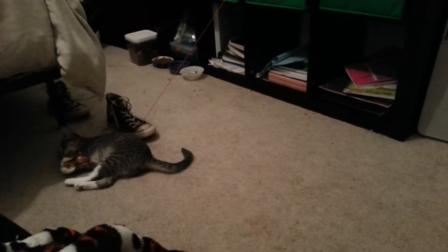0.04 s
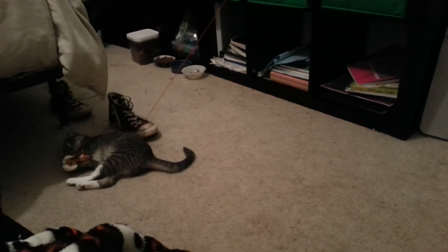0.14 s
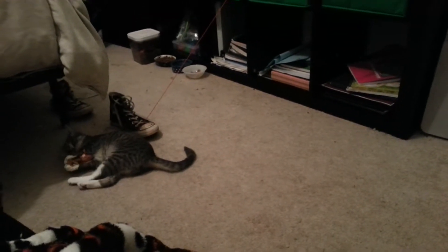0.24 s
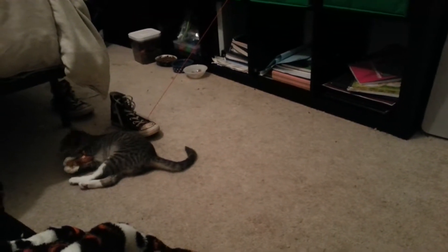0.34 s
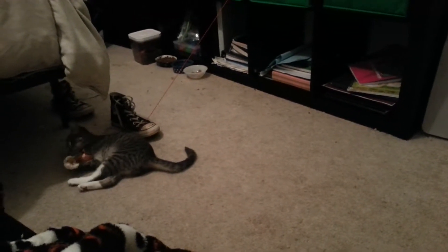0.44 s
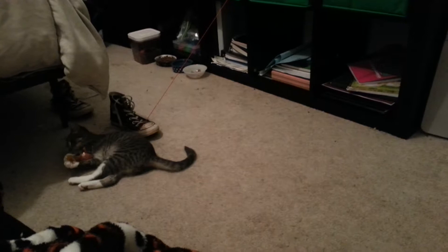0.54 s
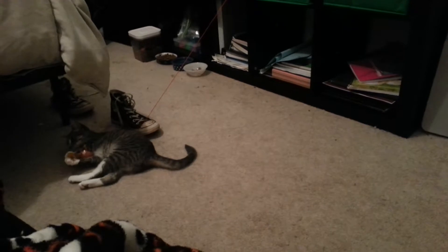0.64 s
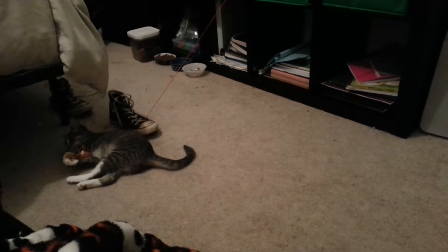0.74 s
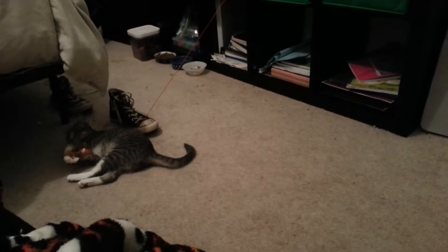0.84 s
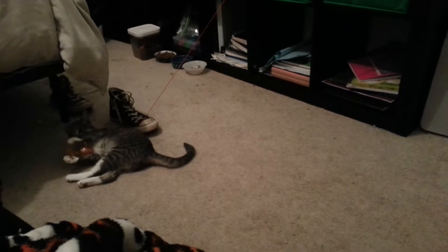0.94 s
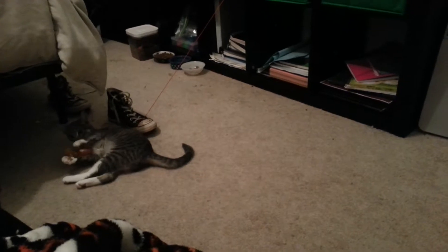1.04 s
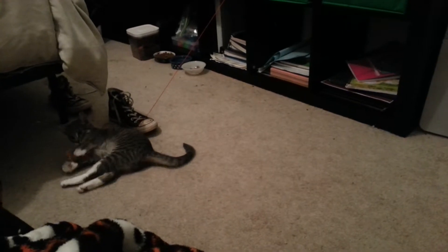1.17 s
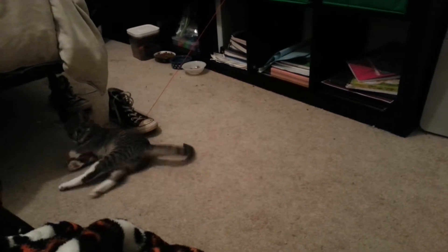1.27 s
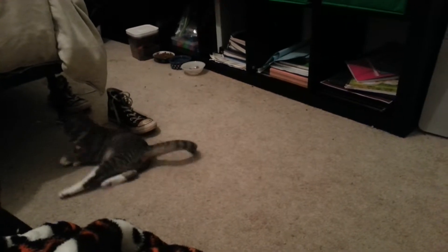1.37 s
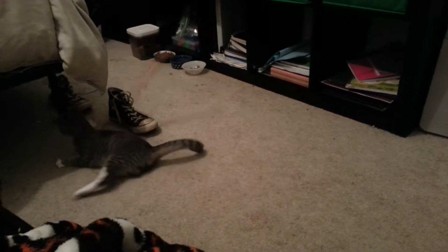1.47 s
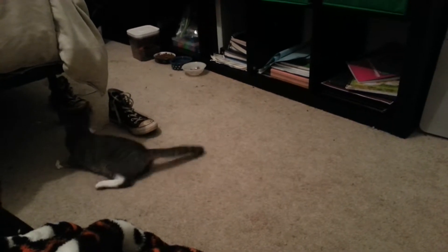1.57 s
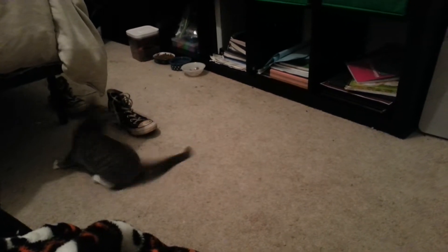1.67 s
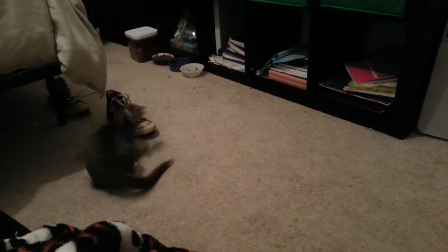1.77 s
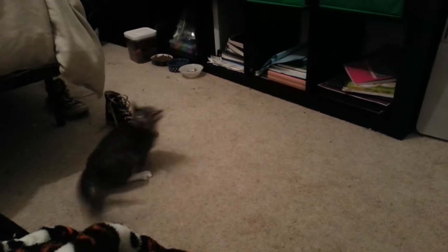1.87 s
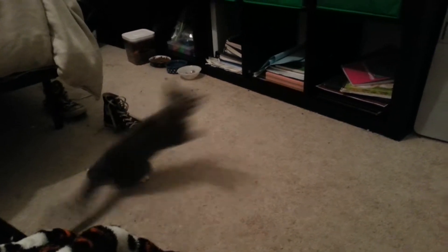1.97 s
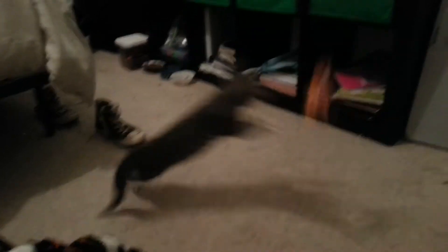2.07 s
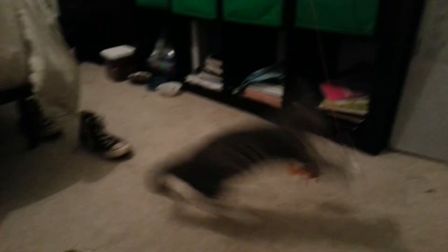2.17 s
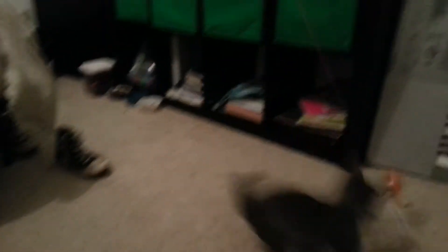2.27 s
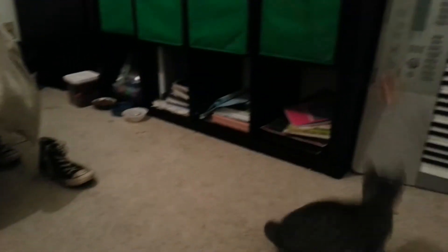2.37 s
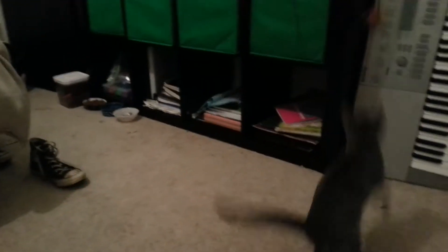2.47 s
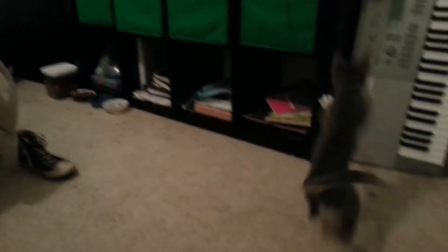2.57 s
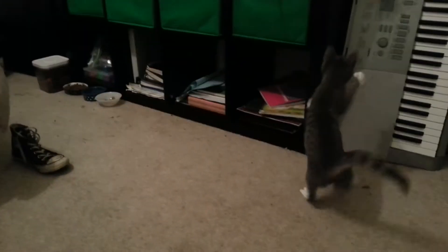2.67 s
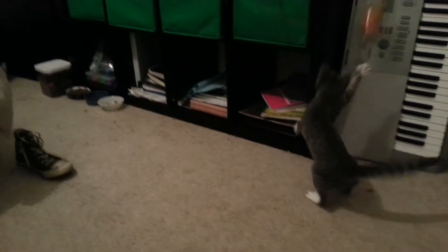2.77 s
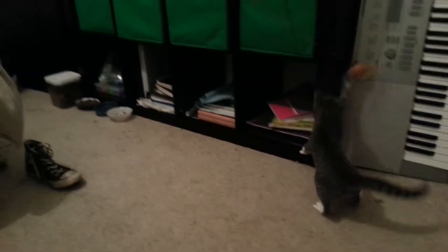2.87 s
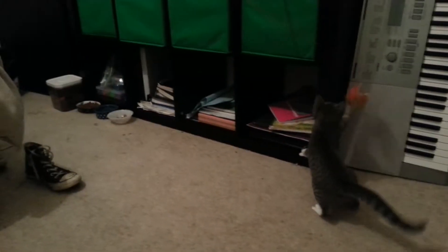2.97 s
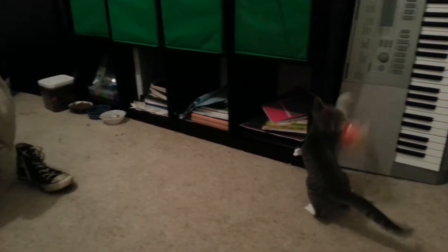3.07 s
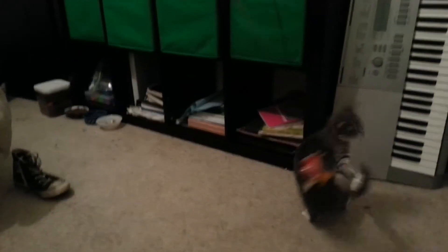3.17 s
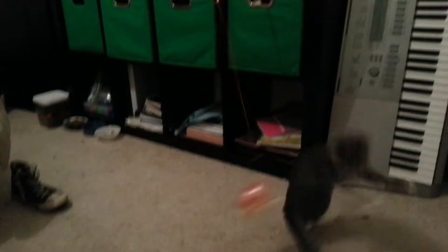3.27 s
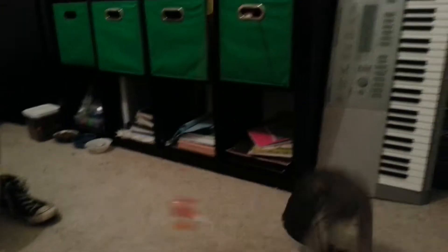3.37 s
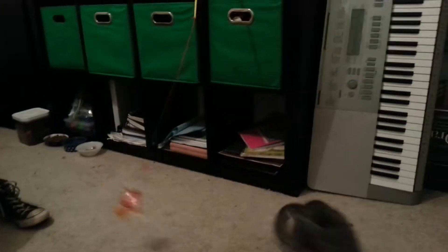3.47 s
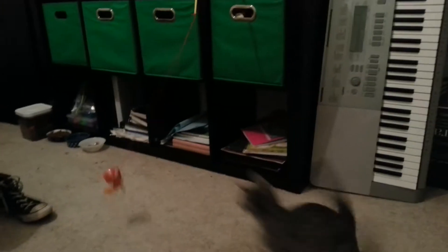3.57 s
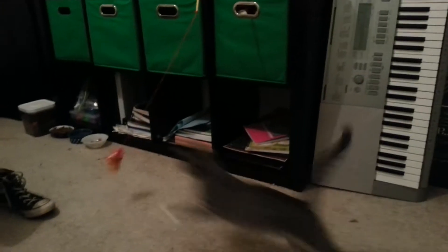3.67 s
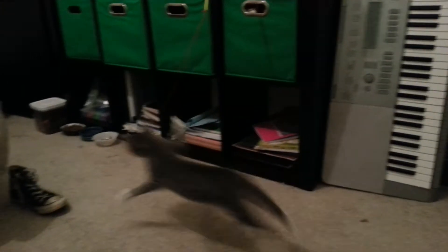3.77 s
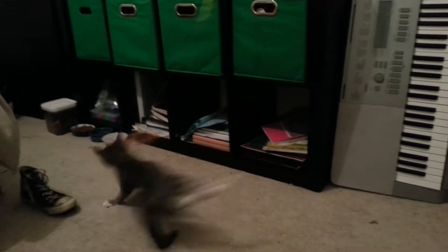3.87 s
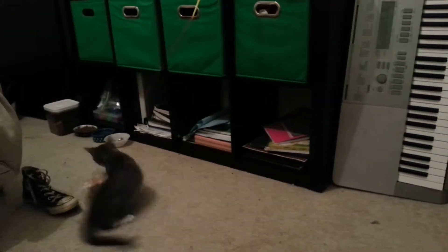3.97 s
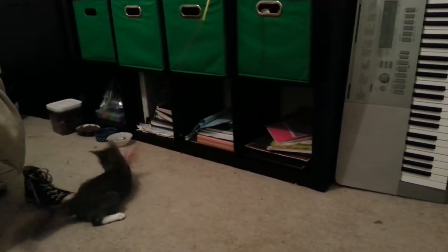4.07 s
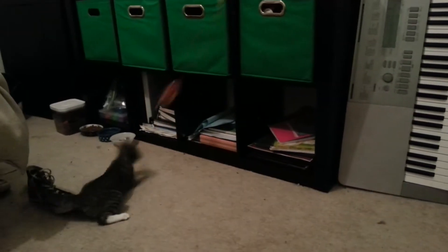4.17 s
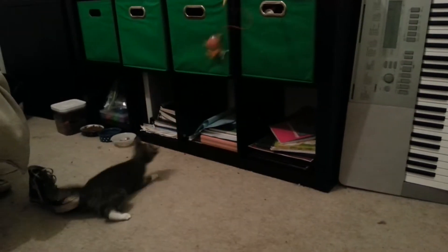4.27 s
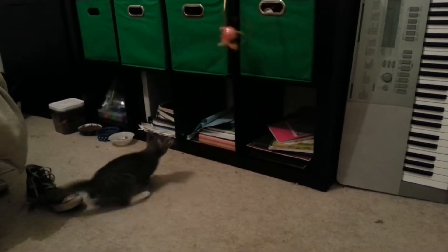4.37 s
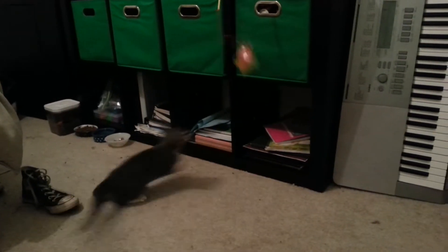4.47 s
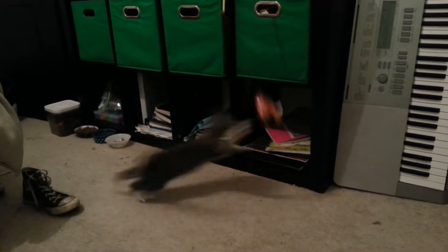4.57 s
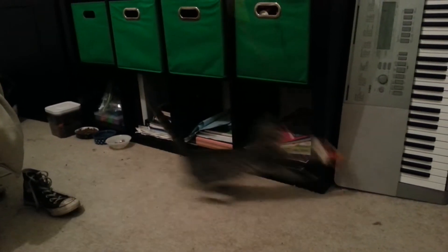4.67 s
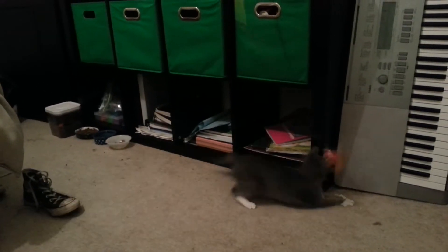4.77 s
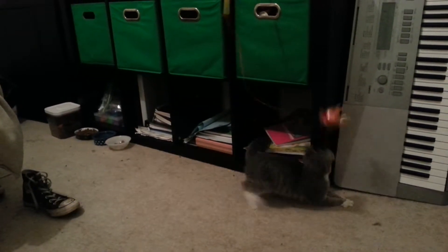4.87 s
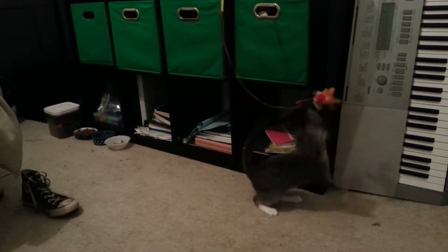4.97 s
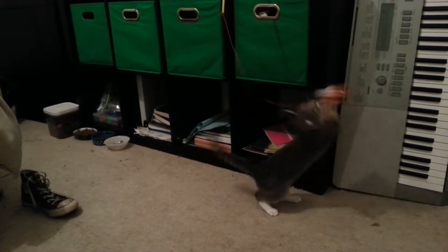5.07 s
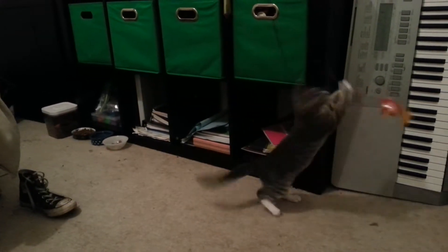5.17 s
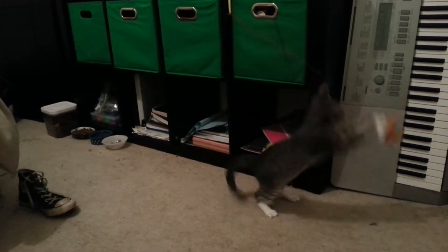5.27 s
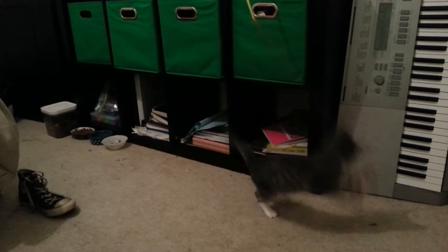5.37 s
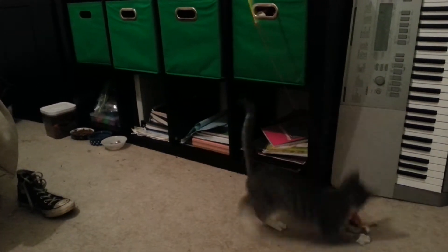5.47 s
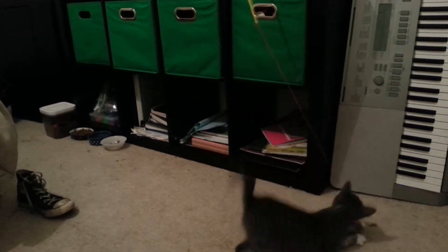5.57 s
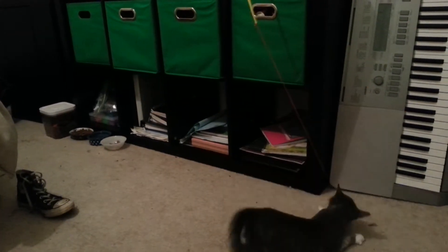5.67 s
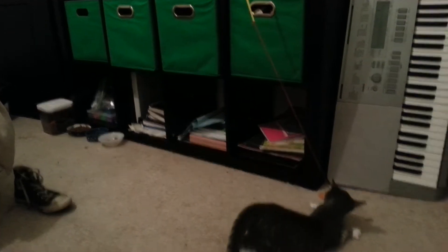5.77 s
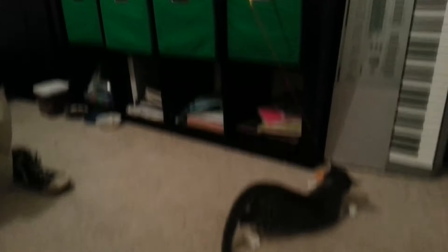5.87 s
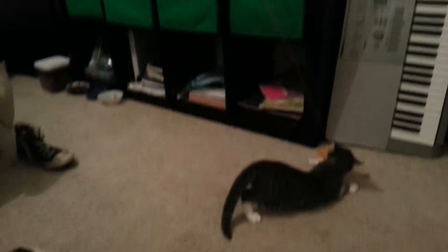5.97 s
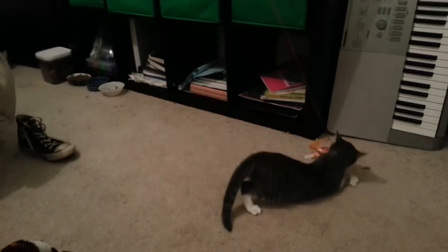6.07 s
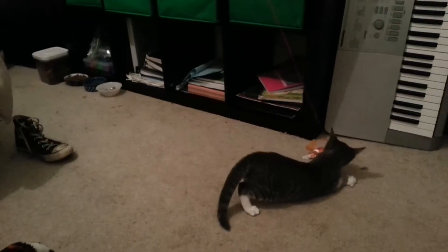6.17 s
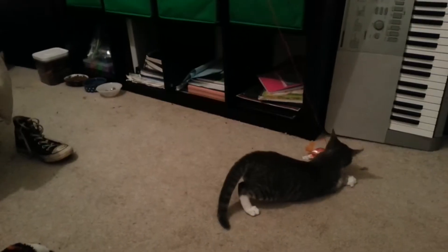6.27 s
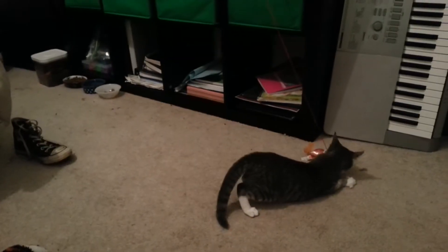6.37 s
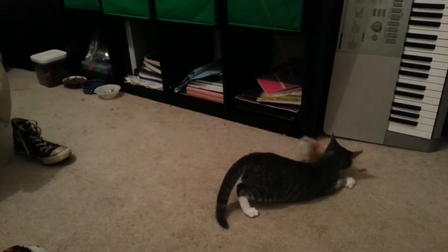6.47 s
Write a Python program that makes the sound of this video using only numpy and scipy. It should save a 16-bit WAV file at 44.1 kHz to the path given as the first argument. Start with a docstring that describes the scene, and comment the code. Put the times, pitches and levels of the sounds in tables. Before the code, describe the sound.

In a small carpeted room, a low hum and faint trickling bubbles set the background. Close by and slightly right of the stereo microphone, a kitten springs up, its paws thudding on the floor and its claws scuffing the carpet. Near the middle, a toy on a string clacks hard against a hollow plastic case, which bumps the floor. More soft pounces, scuffs and a few light taps follow, then the playing stops.

```python
"""Kitten at play in a bedroom

A small carpeted room, on a stereo microphone. Close by and a little to the right, a kitten chases a toy
on a string: paws thud on the floor, claws and fur scuff the pile, and the swinging toy clacks against
furniture, once hard on the hollow plastic case of a leaning keyboard, which bumps down on the floor.
Farther off, bubbles trickle faintly, as from a tank filter, over a low room hum."""
import sys
import numpy as np
from scipy import signal
from scipy.fft import rfft, irfft, next_fast_len
from scipy.io import wavfile
from scipy.ndimage import uniform_filter1d

SR = 44100
rng = np.random.default_rng(int(sys.argv[2]) if len(sys.argv) > 2 else 0)


def output_pcm(signal):
    """Save a mono or channel-first signal as 16-bit PCM at the path in sys.argv[1].

    Samples are clipped to [-1, 1] before scaling.
    """
    pcm = np.clip(np.atleast_2d(signal).T, -1, 1) * 32767
    wavfile.write(sys.argv[1], SR, np.round(pcm).astype(np.int16))


N = 287776
T = np.arange(N) / SR
SHORT_T = T[:SR // 2]  # half a second, for one event or one room response


def undb(db):
    """Decibels to gain."""
    return 10 ** (np.asarray(db) / 20)


def unit(x):
    """Scale to rms 1."""
    return x / np.sqrt(np.mean(x ** 2))


def unit_energy(x):
    """Scale a short sound to the energy of 10 ms at rms 1."""
    return x / np.sqrt(np.sum(x ** 2) / (SR / 100))


def add(track, start_s, x):
    """Mix x into the track from start_s on."""
    i = max(int(start_s * SR), 0)
    track[..., i:i + x.shape[-1]] += x[..., :N - i]


def shape(x, gain):
    """Filter by a gain that is a function of frequency."""
    size = next_fast_len(2 * x.shape[-1])
    hz = np.maximum(np.fft.rfftfreq(size, 1 / SR), 1)
    return irfft(rfft(x, size) * gain(hz), size)[..., :x.shape[-1]]


def colour(x, points):
    """Minimum-phase filter through points of f/Hz, gain/dB."""
    point_hz, point_db = np.transpose(points)
    hz = np.maximum(np.fft.rfftfreq(2048, 1 / SR), 1)
    gain = undb(np.interp(np.log(hz), np.log(point_hz), point_db))
    cepstrum = irfft(np.log(gain))
    half = len(cepstrum) // 2
    cepstrum[1:half] *= 2  # folding onto positive time makes the filter causal
    cepstrum[half + 1:] = 0
    impulse = irfft(np.exp(rfft(cepstrum)))
    return np.apply_along_axis(signal.fftconvolve, -1, x, impulse)[..., :x.shape[-1]]


def ring(modes):
    """Decaying tones, all struck together, from rows of f/Hz, level/dB, t60/s."""
    return sum(undb(db - 60 * SHORT_T / t60) * np.cos(2 * np.pi * hz * SHORT_T) for hz, db, t60 in modes)


def diffuse(size, apart_hz, bass_side):
    """Stereo noise, alike in the bass and unrelated well above apart_hz."""
    def side_share(hz):
        return np.clip(bass_side + (1 - bass_side) * hz ** 2 / (hz ** 2 + apart_hz ** 2), 0, 1) / 2

    mid, side = rng.standard_normal((2, size))
    mid = shape(mid, lambda hz: np.sqrt(1 - side_share(hz)))
    side = shape(side, lambda hz: np.sqrt(side_share(hz)))
    return np.array([mid + side, mid - side])


def room_tone(noise_db=-55):
    """Ventilation rumble, microphone hiss and a few faint machine tones."""
    # spectrum of the still room: f/Hz, relative level/dB
    spectrum = [(15, -78), (25, -47), (44, -16.5), (141, -2.5), (240, -3.5), (331, -8.5), (468, -11),
                (796, -14), (910, -14), (1190, -15), (2080, -18), (2780, -22.5), (3010, -18), (6520, -27.5),
                (14500, -23.5)]
    # steady machine tones: f/Hz, level/dB
    tones = [(60, -79.5), (97, -80.5), (715, -79), (2105, -83), (14002, -82)]
    noise = unit(colour(diffuse(N, apart_hz=780, bass_side=0.61), spectrum))
    hum = sum(undb(db) * np.sqrt(2) * np.sin(2 * np.pi * (hz * T + rng.random())) for hz, db in tones)
    return undb(noise_db) * noise + hum


def floor_thuds(gain_db=-4, second_db=-5, soft_s=0.004, hard_s=0.0028, range_db=31, detune=0.017):
    """Paws land, and once the struck keyboard bumps down: boards ring, with a deep thump or a knock."""
    # thuds of two contacts each (for the kitten, fore then hind paws):
    # t/s, level/dB, hardness (0 thump, 1 knock), second contact's delay/s, knock pitch ratio
    thuds = [(0.02, -48, 0.95, 0.0119, 1.103), (1.634, -32.5, 0.95, 0.03, 1.178),
             (1.642, -28.5, 0.035, 0.025, 1), (2.347, -35.5, 0.59, 0.037, 1.02),
             (2.507, -40, 0.61, 0.042, 0.99), (2.701, -38.5, 0.85, 0.074, 1),
             (2.944, -32, 0.88, 0.028, 1.1), (3.531, -34.5, 0.65, .052, 0.89),
             (3.94, -44.5, 0.69, 0.028, 0.89), (4.027, -40.5, 0.81, .02, 1.03), (4.107, -40, 0.85, .05, 1),
             (4.327, -34.5, 0.09, 0.01214, 1.33), (4.794, -32.5, 1, .026, 0.738),
             (5.505, -35, 0.26, 0.11, .8)]
    # ring of the floorboards: f/Hz, level/dB, t60/s
    board_modes = [(196.4, -1, 0.043), (220.7, 0, 0.13), (258, -5, 0.09), (299.6, -0.5, 0.073),
                   (361, -4.5, 0.081)]
    # the whole floor giving under the weight: f/Hz, level/dB, t60/s
    joist_modes = [(95.5, -21, 0.15), (171.6, 3.5, 0.026)]
    # knock of a hard contact: f/Hz, level/dB, t60/s
    knock_modes = [(427, -11.5, 0.038), (399.4, -5, 0.065), (474, 13, 0.029), (571, -6.5, 0.1),
                   (667, -1, 0.035)]
    out = np.zeros(N)
    soft_onset = (1 - np.exp(-SHORT_T / soft_s)) ** 2
    hard_onset = (1 - np.exp(-SHORT_T / hard_s)) ** 2
    thump = unit_energy(ring(joist_modes) * soft_onset)
    floor_spots = 2 * rng.random((len(thuds), 2)) - 1
    for (start_s, db, hardness, second_s, knock_pitch), spots in zip(thuds, floor_spots):
        thump_gain = undb(2 - range_db * hardness)
        knock_gain = undb(1 - range_db * (1 - hardness))
        for delay_s, contact_db, spot in zip((0, second_s), (0, second_db), spots):
            retune = np.array([1 + detune * spot, 1, 1])  # each spot on the floor has its own pitch
            boards = unit_energy(ring(board_modes * retune) * soft_onset)
            knock = unit_energy(ring(knock_modes * retune * [knock_pitch, 1, 1]) * hard_onset)
            # a lighter contact loses thump and knock faster than the ring of the boards
            contact = boards + undb(contact_db) * (thump_gain * thump + knock_gain * knock)
            add(out, start_s + delay_s, undb(db + gain_db + contact_db) * contact)
    # a small patch of floor radiates no deep bass
    return shape(out, lambda hz: 1 / np.sqrt(1 + (72 / hz) ** 10))


def trickle(count=300, small_db=-67, spread_db=4, middle_hz=2800, spread_octaves=0.364,
            decay_cycles=9, glide=0.025, swell_s=0.0064, wobble=0.059):
    """Bubbles ring for some cycles, wobble and rise in pitch; many small ones lie under the clear ones."""
    # the clearest bubbles: t/s, f/Hz, level/dB
    clear_bubbles = [(0.086, 2930, -55), (0.325, 1406, -48), (1.225, 2120, -57), (1.367, 2520, -58.5),
                     (2.036, 2510, -52.5), (2.421, 2530, -54.5), (2.816, 2790, -58), (3.895, 3220, -53),
                     (5.608, 2400, -51), (6.057, 2940, -58.5)]
    out, t = np.zeros(N), T[:SR // 10]
    starts = rng.random(count) * T[-1]
    pitch_scatter, level_scatter = rng.standard_normal((count, 2)).T
    pitches = middle_hz * 2 ** (spread_octaves * pitch_scatter)
    levels = small_db + spread_db * np.minimum(level_scatter, 1)
    small_bubbles = list(zip(starts, pitches, levels))
    for start_s, hz, db in clear_bubbles + small_bubbles:
        age = hz * t / decay_cycles
        waver = wobble * unit(uniform_filter1d(rng.standard_normal(len(t)), size=60))
        rise = glide * (np.minimum(age, 3) - 1)
        phase = 2 * np.pi * np.cumsum(hz * (1 + waver + rise)) / SR
        envelope = np.exp(-age) * (1 - np.exp(-t / swell_s))
        add(out, start_s, undb(db) * unit_energy(np.sin(phase) * envelope))
    return out


def scuffs(fibres_per_s=1200, grain_db=6.5, rise_share=0.033,
           sheen_hz=11000, sheen_db=5, sheen_slope=0.69):
    """Fibres snap free one after another in a spray of uneven clicks; louder strokes have more sheen."""
    # claws and fur dragged over carpet and cloth: t/s, level/dB, fade time/s
    strokes = [(1.511, -52, 0.076), (1.636, -38, 0.041), (2.256, -50.5, 0.055), (2.334, -52.5, 0.26),
               (2.519, -41.5, 0.028), (2.70, -53.5, 0.053), (3.524, -50.5, 0.062), (3.934, -49, 0.13),
               (4.073, -48, 0.026), (4.119, -48, 0.075), (4.321, -51, .034), (4.675, -51, 0.082),
               (4.769, -47.5, 0.087), (5.118, -49, 0.08), (5.36, -56, 0.32), (5.504, -47.5, 0.052)]
    # spectrum of the snapping fibres: f/Hz, relative level/dB
    spectrum = [(200, -3), (600, 5), (1500, 2), (3000, 4), (4800, 5), (6300, -1.5), (10000, -2.5),
                (14500, -13)]
    drag_envelope, sheen_envelope = np.zeros((2, N))
    loudest_db = max(db for _, db, _ in strokes)
    for start_s, db, fade_s in strokes:
        rise_s = rise_share * fade_s
        fade = np.exp(-np.maximum(SHORT_T - rise_s, 0) / fade_s)
        stroke = undb(db) * np.minimum(SHORT_T / rise_s, 1) * fade
        add(drag_envelope, start_s, stroke)
        add(sheen_envelope, start_s, stroke * undb(sheen_db + sheen_slope * (db - loudest_db)))
    sizes = undb(grain_db * np.minimum(rng.exponential(size=N), 4))
    snaps = (rng.random(N) < fibres_per_s / SR) * sizes * rng.choice([-1, 1], N)
    drag = unit(colour(snaps, spectrum))
    # shifted by a second, so the sheen's clicks fall apart from the drag's
    sheen = unit(shape(np.roll(snaps, SR), lambda hz: 1 / np.sqrt(1 + (sheen_hz / hz) ** 6)))
    return drag_envelope * drag + sheen_envelope * sheen


def clacks(crack_s=0.0033, contact_s=0.0022, ring_db=2.5,
           contacts=3, first_gap_s=0.0037, gap_ratio=0.83, bounce_db=-2):
    """Each clack is a few quickening bounces, a crack plus a plastic ring; softer clacks ring less."""
    # clacks of the toy, with one quick echo just after the hardest: t/s, level/dB, treble tilt/dB
    toy_clacks = [(1.6317, -33, -14.5), (1.654, -37, 10), (2.696, -41, -7), (2.712, -46.5, 13),
                  (2.9351, -17.5, 8.5), (2.962, -30, 1), (4.771, -47, -11), (4.785, -40, -7),
                  (4.797, -49.5, -10)]
    # ring of hollow plastic: f/Hz, level/dB, t60/s
    case_modes = [(1085, 6.5, 0.025), (1133, 10, 0.078), (1276, 13, 0.021), (1375, 7.5, 0.027),
                  (1980, -12, 0.06), (2130, -4, 0.051), (2880, -9, 0.0061), (3370, 5.5, 0.016),
                  (4000, 2, 0.0093), (4600, 13.5, 0.0093)]
    # crack of a plastic contact: f/Hz, relative level/dB
    crack_spectrum = [(100, -54), (220, -8), (400, -11), (600, 1.5), (900, 2), (1600, 0.5), (2500, 1.5),
                      (3500, 1), (5000, -3), (6300, -9.5), (11000, -12), (15000, -24)]
    out = np.zeros(N)
    case = unit_energy(ring(case_modes) * (1 - np.exp(-SHORT_T / contact_s)))
    hardest_db = max(db for _, db, _ in toy_clacks)
    for start_s, db, treble_db in toy_clacks:
        ring_gain = undb(ring_db + db - hardest_db)
        for bounce in range(contacts):
            burst = rng.standard_normal(len(SHORT_T)) * np.exp(-SHORT_T / crack_s)
            crack = unit_energy(colour(burst, crack_spectrum))
            clack = colour(crack + ring_gain * case, [(500, 0), (8000, treble_db)])
            add(out, start_s, undb(db + bounce * bounce_db) * unit_energy(clack))
            start_s += first_gap_s * gap_ratio ** bounce
    return out


def ticks(snap_s=0.0014, half_width_octaves=0.88):
    """Tiny snaps of claw, string or wand, and one dull handling click close to the microphone."""
    # the handling click, then the snaps: t/s, level/dB, centre f/Hz
    clicks = [(2.324, -42.5, 640), (2.6568, -50.5, 12100), (3.209, -54, 4400), (3.866, -54, 4070),
              (3.940, -49.5, 8300), (5.006, -48.5, 4340), (5.349, -55.5, 11200)]
    out = np.zeros(N)
    edge = 2 ** half_width_octaves
    for start_s, db, hz in clicks:
        burst = rng.standard_normal(len(SHORT_T)) * np.exp(-SHORT_T / snap_s)
        band = [(hz / edge ** 4, -30), (hz / edge, -6), (hz, 0), (hz * edge, -6), (hz * edge ** 4, -40)]
        add(out, start_s, undb(db) * unit_energy(colour(burst, band)))
    return out


def bedroom(early_t60=0.19, late_t60=0.41, late_db=-11, treble_hz=7500, onset_s=0.00094):
    """Room response: quick reflections off close furniture, then a duller tail."""
    early = diffuse(len(SHORT_T), apart_hz=620, bass_side=0.015) * undb(-60 * SHORT_T / early_t60)
    late = diffuse(len(SHORT_T), apart_hz=596, bass_side=0.085) * undb(-60 * SHORT_T / late_t60)
    late = shape(late, lambda hz: 1 / np.sqrt(1 + (hz / treble_hz) ** 2))
    echoes = (early + undb(late_db) * late) * np.minimum(SHORT_T / onset_s, 1) ** 2
    return unit(echoes) / np.sqrt(len(SHORT_T))


def at_microphone(x, room, wet_db, lag_s=0):
    """Direct sound, reaching the left port lag_s late, plus its reflections, at constant total power."""
    direct = np.array([np.interp(T - lag_s, T, x), x])
    echoes = signal.fftconvolve(x[None], room, axes=1)[:, :N]
    return (direct + undb(wet_db) * echoes) / np.sqrt(1 + undb(wet_db) ** 2)


def scene():
    """The kitten plays close by, a little to the right; the far water arrives mostly as reflections."""
    room = bedroom()
    play = at_microphone(floor_thuds(), room, wet_db=0)
    play += undb(-1.5) * at_microphone(clacks(), room, wet_db=0, lag_s=70e-6)
    play += at_microphone(scuffs(), room, wet_db=4.5, lag_s=70e-6)
    play += at_microphone(ticks(), room, wet_db=-0.5, lag_s=20e-6)
    water = undb(4) * at_microphone(trickle(), room, wet_db=18)
    return play + water + room_tone()


def record(dry):
    """Each microphone port colours the sound in its own way; the top is cut steeply at 14.8 kHz."""
    # port responses: f/Hz, gain/dB
    left = [(200, 3.0), (700, 2.5), (1150, -0.5), (2200, 0.4), (4600, -0.5), (7000, 2.5), (14000, -1.0)]
    right = [(200, 1.5), (700, 3.85), (1150, -0.24), (2200, 0.85),
             (4600, 3.5), (7000, 3.5), (14000, -0.4)]
    ports = np.array([colour(dry[0], left), colour(dry[1], right)])
    top_cut = signal.ellip(10, 0.2, 70, 14800, fs=SR, output="sos")
    return signal.sosfilt(top_cut, ports)


dry = scene()
out = record(dry)
output_pcm(out)
```